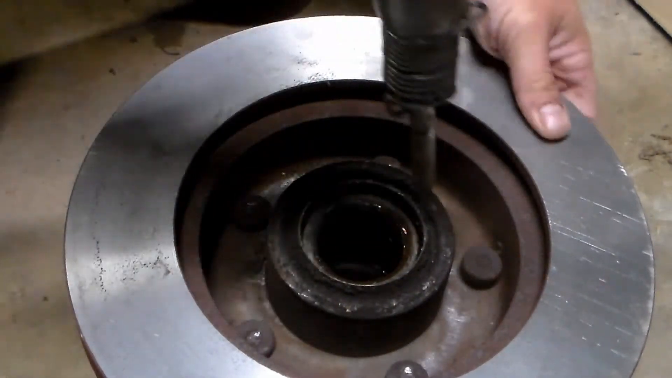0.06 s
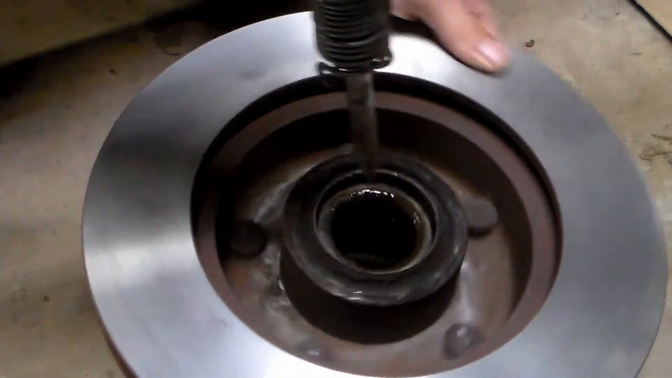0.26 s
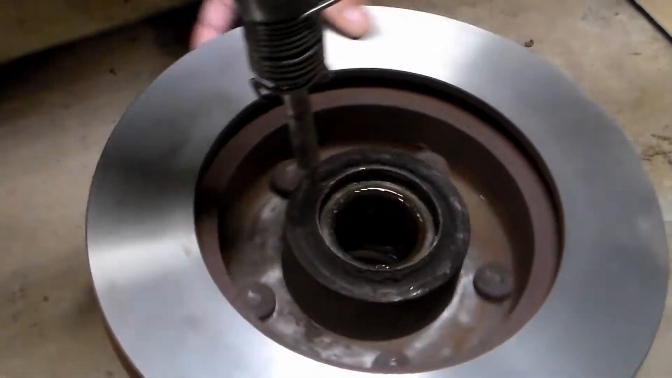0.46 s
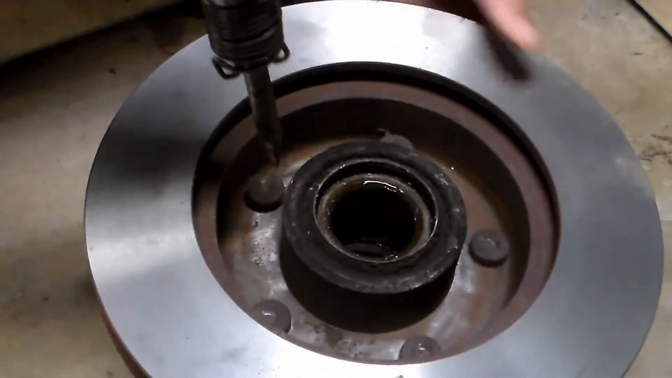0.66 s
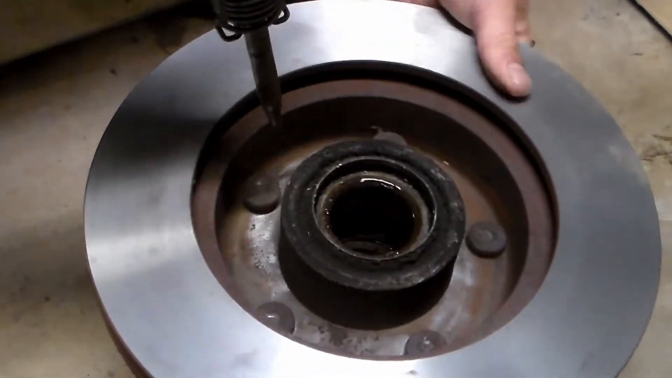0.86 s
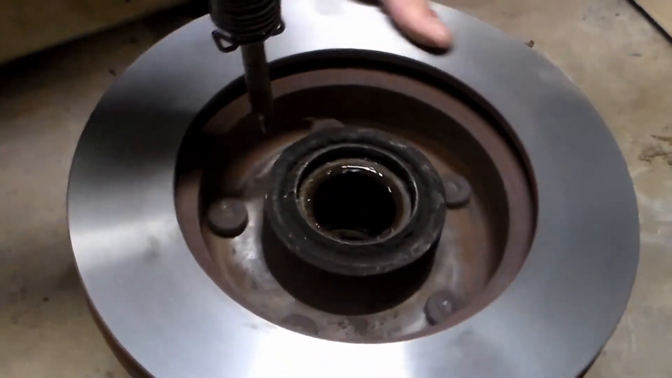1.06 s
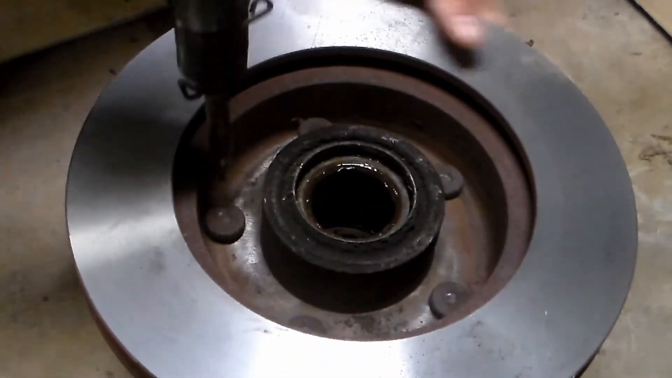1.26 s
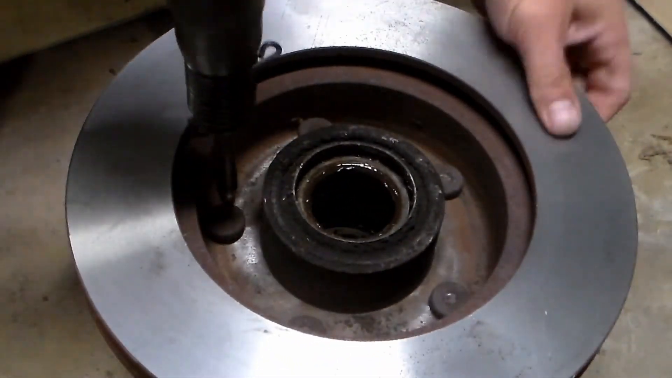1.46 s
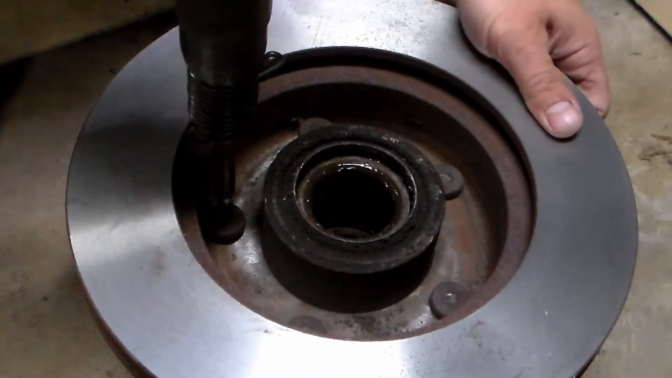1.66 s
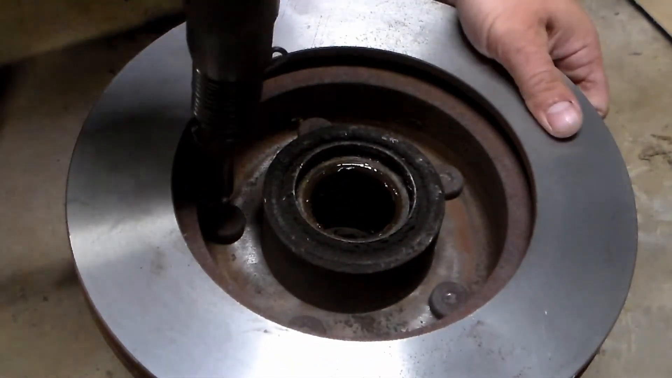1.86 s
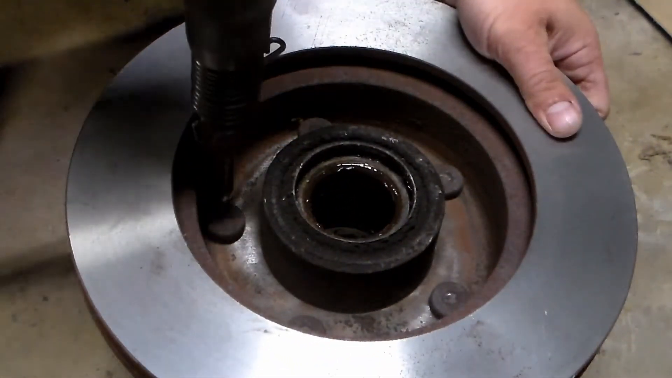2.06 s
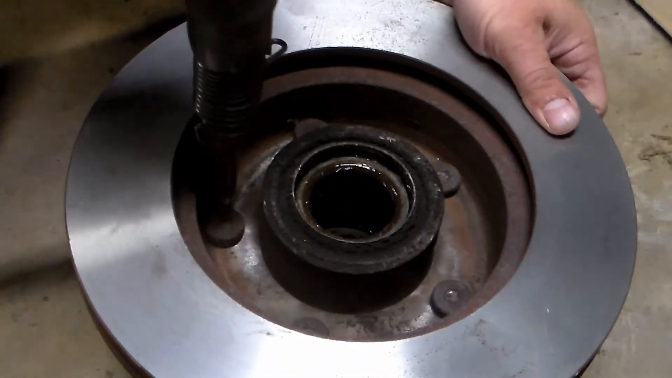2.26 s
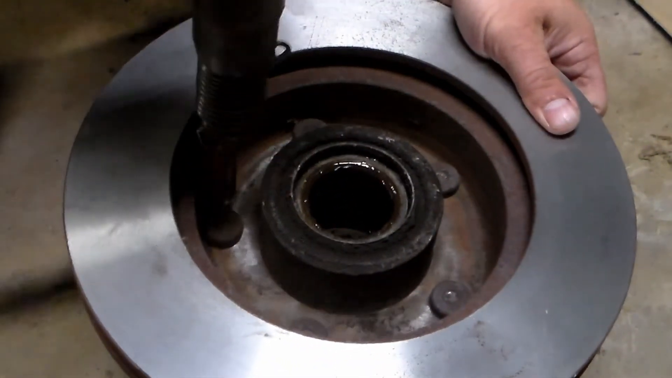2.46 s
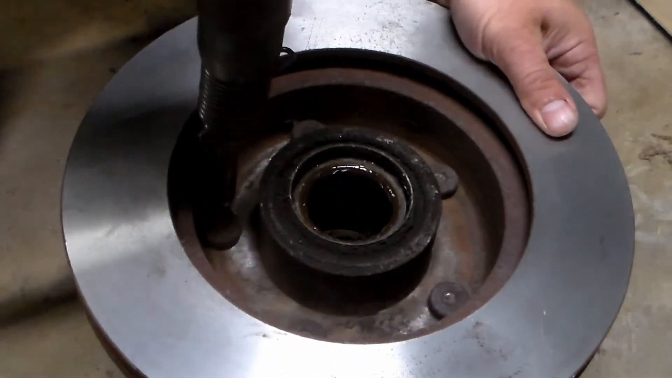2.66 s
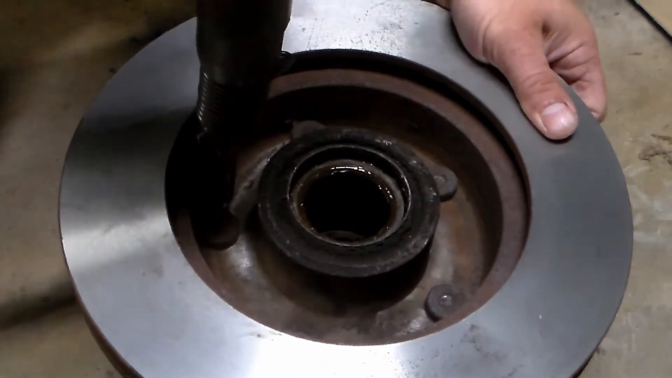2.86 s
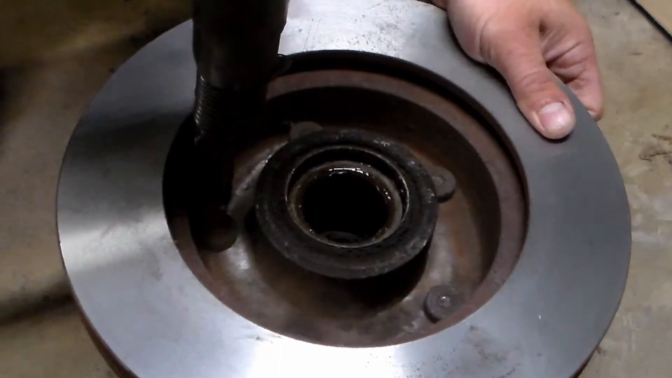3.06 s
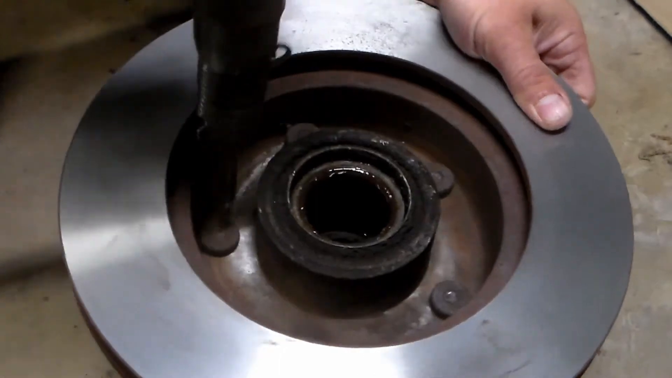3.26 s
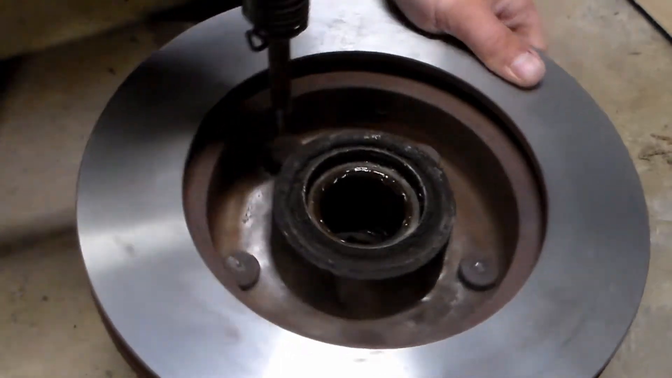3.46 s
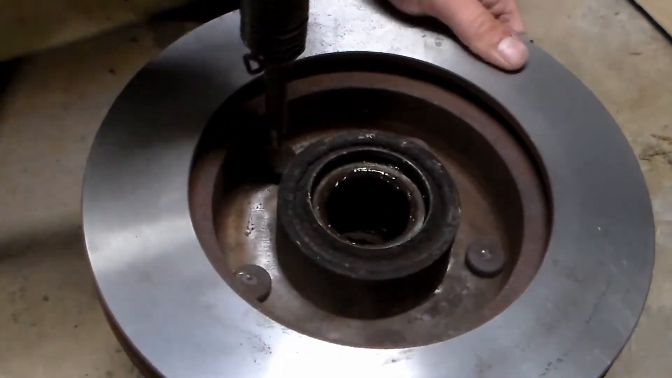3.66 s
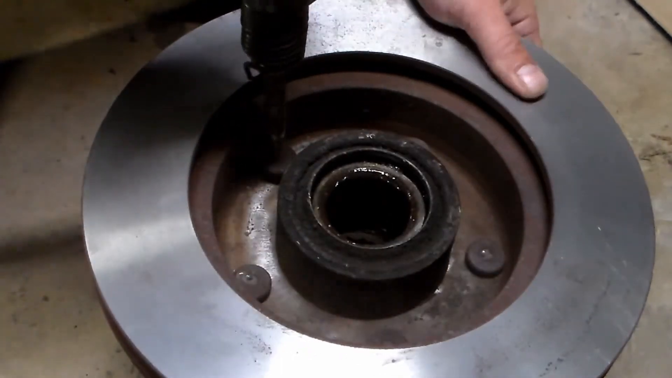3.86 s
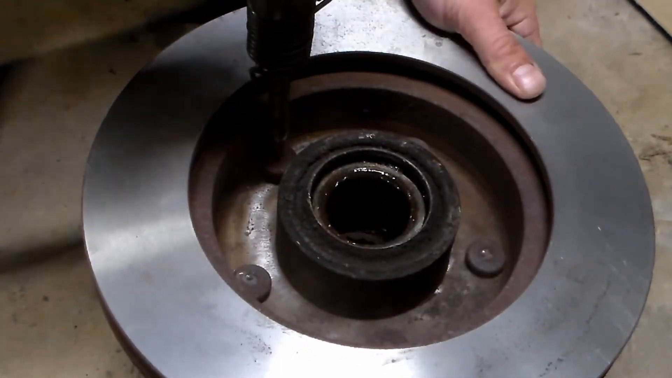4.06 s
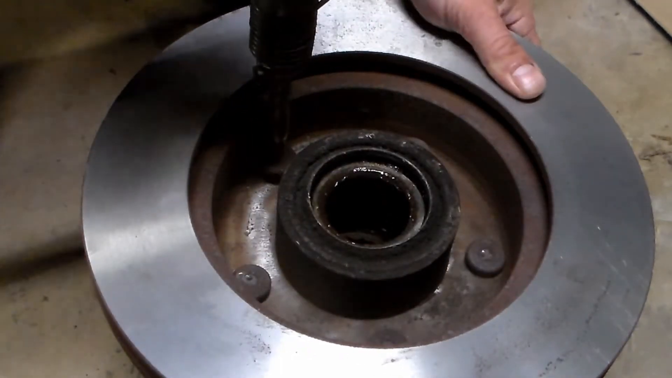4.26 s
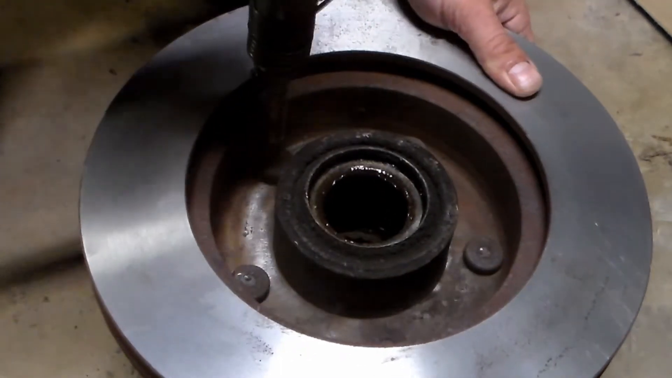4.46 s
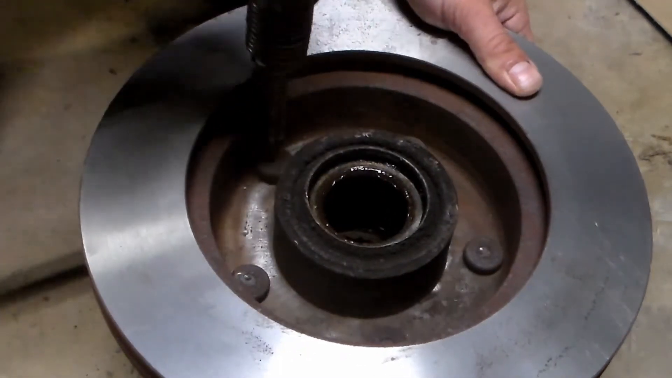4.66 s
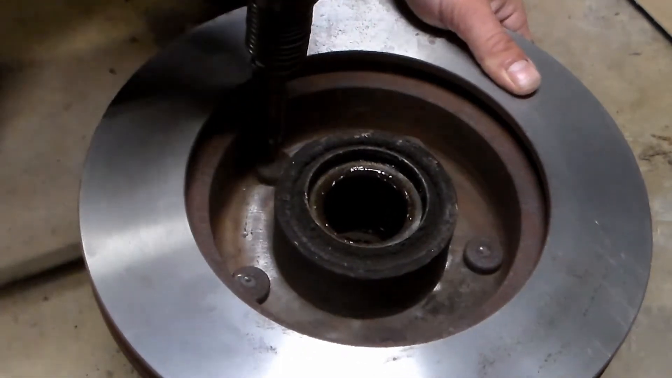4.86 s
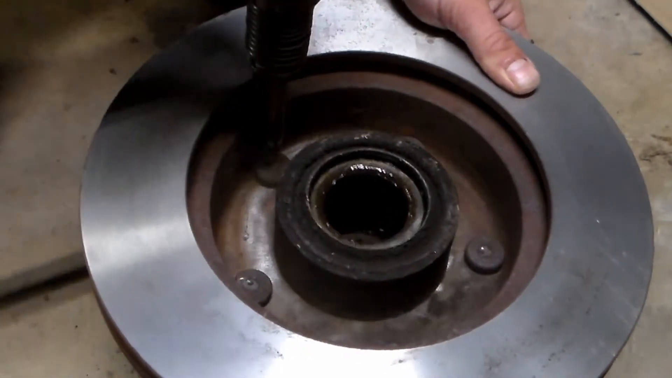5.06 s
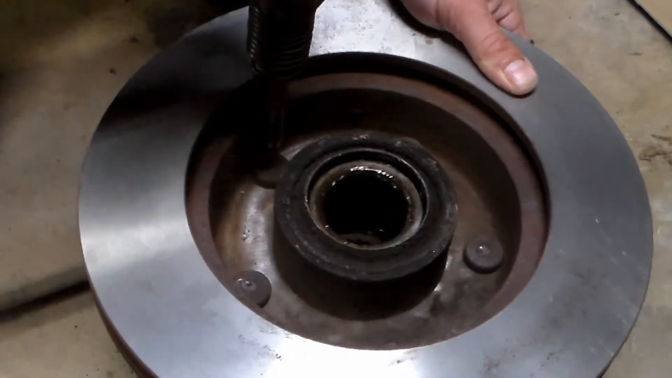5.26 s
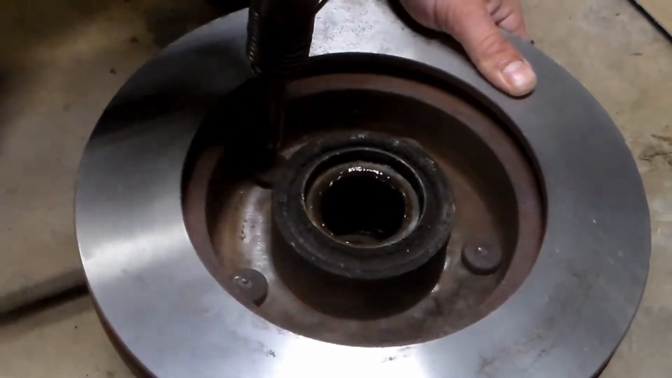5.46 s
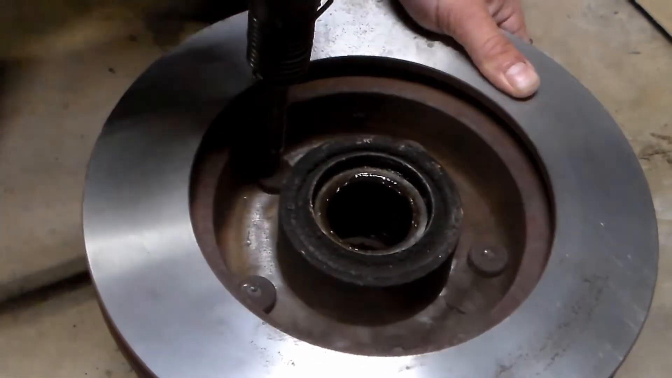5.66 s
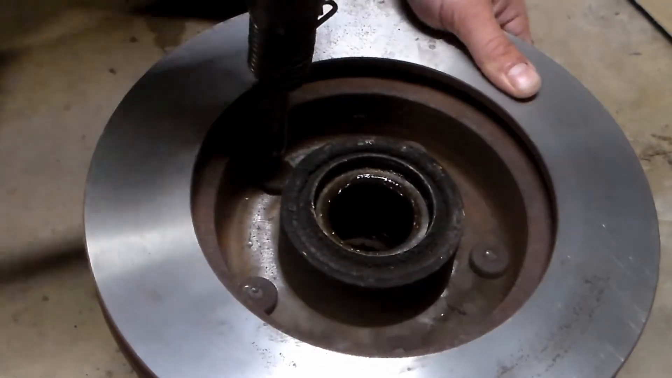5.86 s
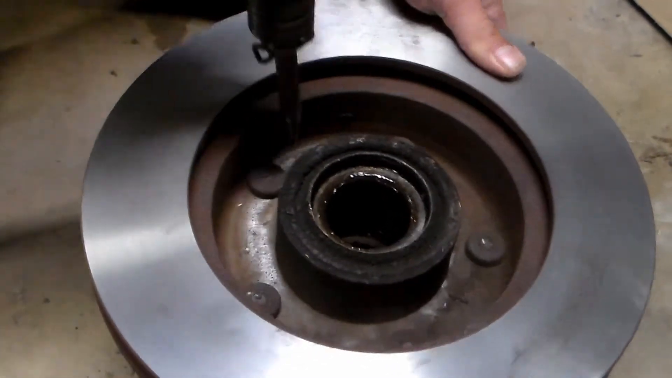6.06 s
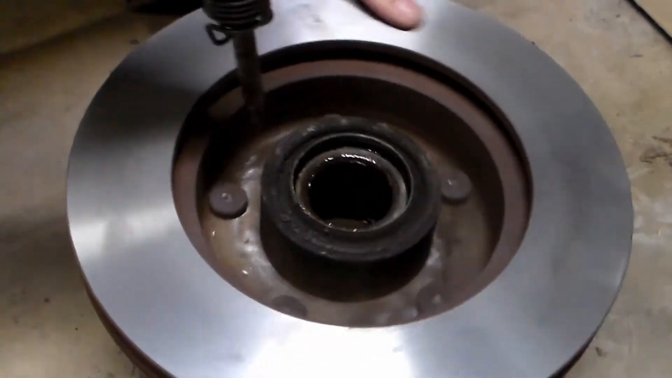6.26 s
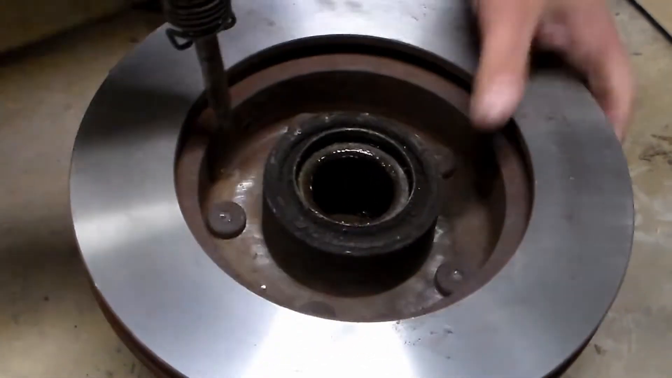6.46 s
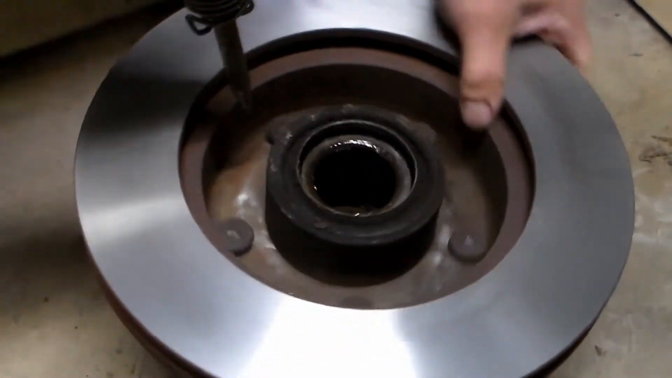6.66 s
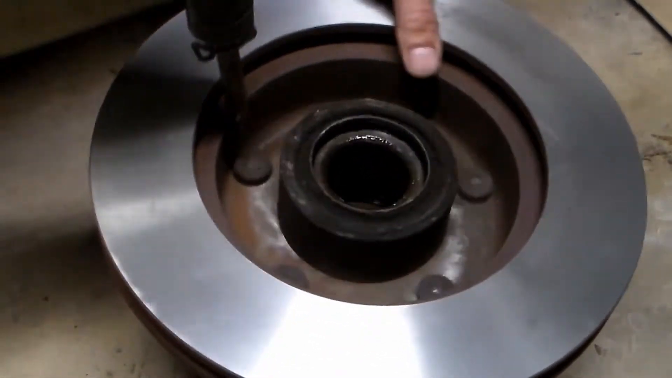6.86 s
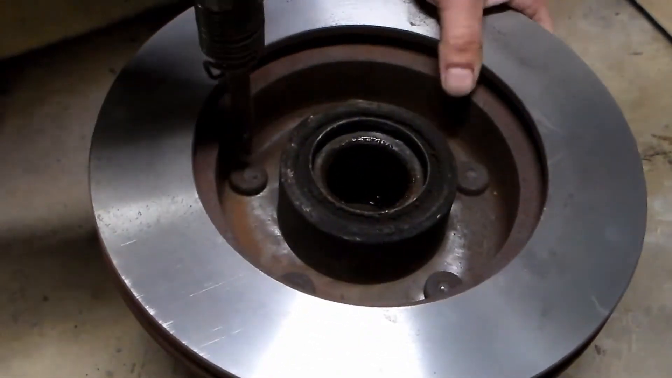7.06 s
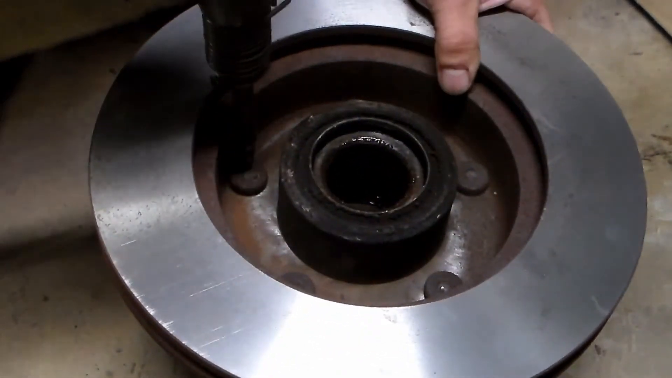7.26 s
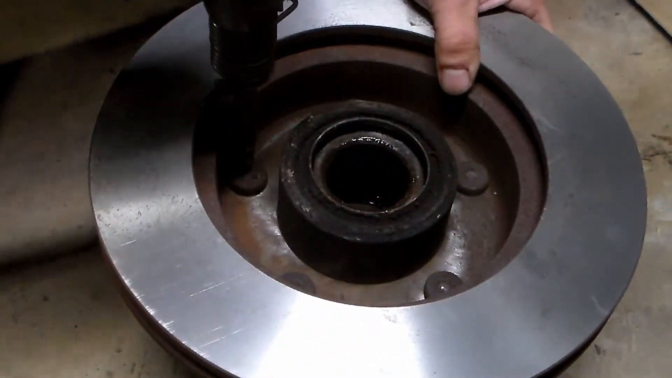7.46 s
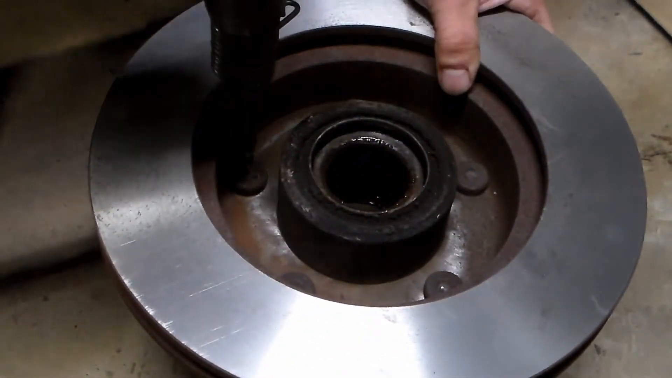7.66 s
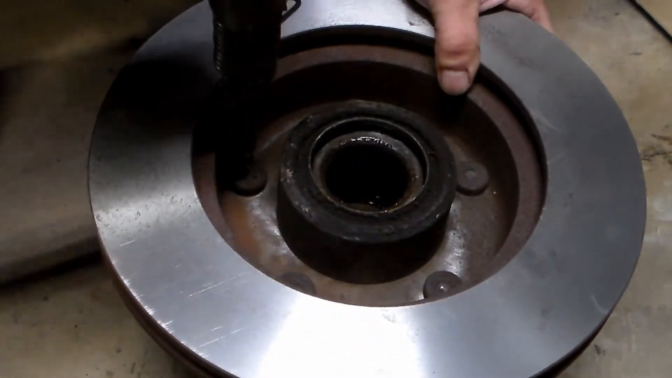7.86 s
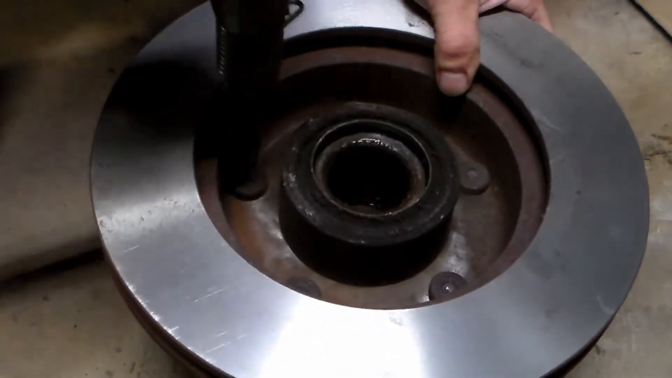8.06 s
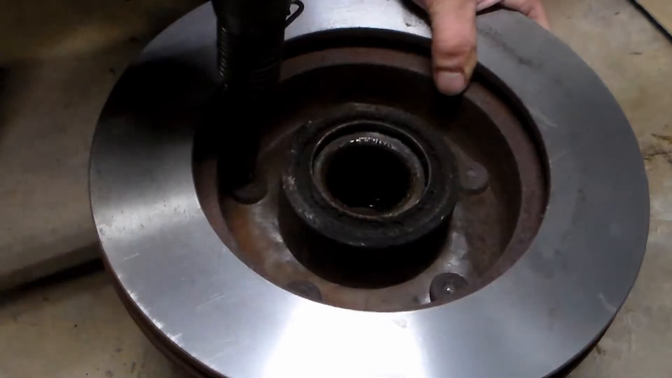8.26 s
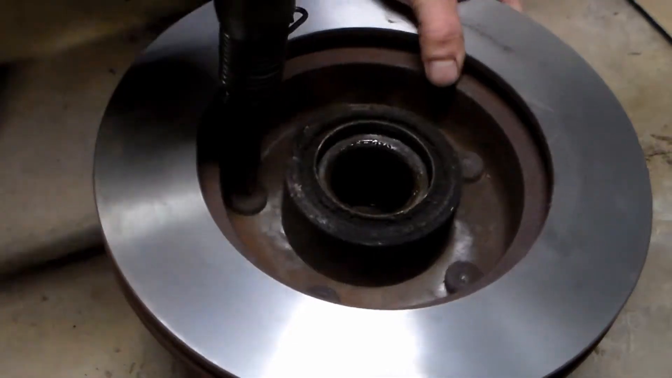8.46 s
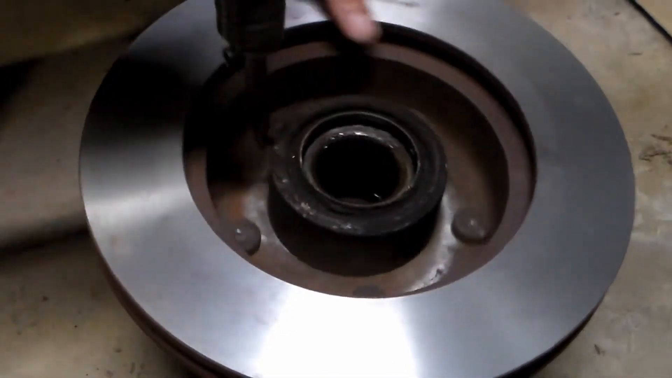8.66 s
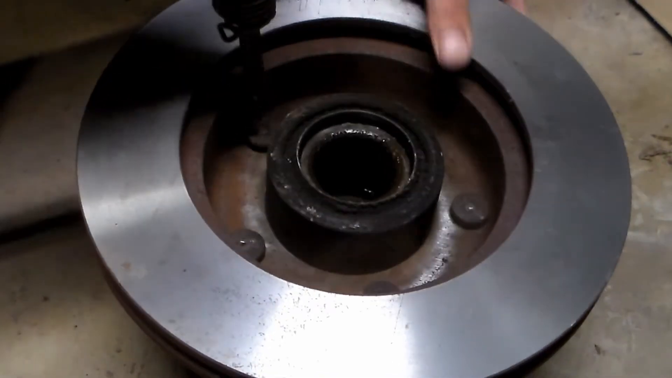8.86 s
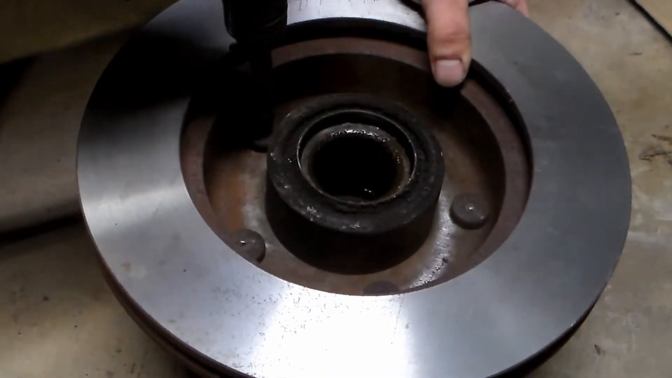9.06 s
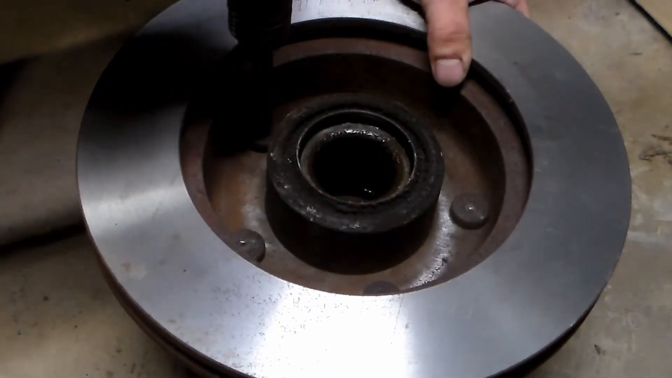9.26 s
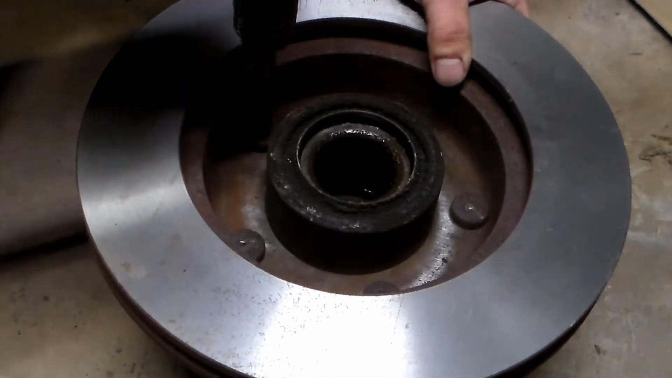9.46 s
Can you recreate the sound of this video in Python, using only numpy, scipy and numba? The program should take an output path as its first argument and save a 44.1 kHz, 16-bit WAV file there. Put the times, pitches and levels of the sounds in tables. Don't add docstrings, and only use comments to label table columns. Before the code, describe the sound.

A small close stereo microphone in a garage with faint mains hum and hiss that duck after loud sounds and creep back. From 0.1 to 0.8 s a heavy iron disc scrapes over concrete, rocking with clicks and dull clunks; another gritty drag follows at 1.0-1.4. Light chisel taps come at 1.7-1.9. Four very short air hammer bursts strike at 2.3, 2.6, 2.85 and 3.1, each two to four or so blows about 30 ms apart: popping exhaust, hissing air, bright ringing iron, the loudest distorting. Quiet scrape at 3.5, taps at 4.1. Five bursts follow at 4.5, 4.85, 5.15, 5.4 and 5.65. At 6.3-6.7 the disc is dragged and knocked more strongly, wobbling to rest by 7.1. Faint taps at 7.4-7.85, then two hard bursts at 8.05 and 8.35. Quiet, with a small ping at 8.9 and chisel taps at 9.2-9.5.

```python
import sys
import numpy as np
from scipy import signal
from scipy.fft import rfft, irfft
from scipy.io import wavfile
from scipy.ndimage import uniform_filter1d, map_coordinates
from numba import njit

SR = 44100
rng = np.random.default_rng(int(sys.argv[2]) if len(sys.argv) > 2 else 0)


def makeup_ratio(level_db):
    decades = np.asarray(level_db, float) / 20
    return 10 ** decades


def transcribe(signal):
    frames = np.atleast_2d(signal).T
    limited = np.clip(frames, -1, 1)
    pcm = np.round(limited * 32767).astype(np.int16)
    wavfile.write(sys.argv[1], SR, pcm)


N = 419832
HOLD = 1300

# (first stroke [s], period [s], strokes [count])
BURSTS = [(2.2972, .0307, 2), (2.5913, .0296, 3), (2.8622, .0298, 3), (3.0958, .0296, 3),
          (4.4938, .0304, 4), (4.8539, .0301, 4), (5.15, .0302, 4), (5.3941, .0296, 4), (5.6558, .0295, 3),
          (8.0664, .0291, 4), (8.3578, .0286, 4)]
# (ring 2-3 kHz [dB], 3-5.5 kHz [dB], above 5.5 kHz [dB])
BITE = [(-5.0, -1.5, -6.5), (-6.0, -12.0, -13.0), (-10.5, -8.0, -9.0), (-13.5, -9.5, -12.5),
        (-4.5, -6.0, -6.5), (-1.0, -3.5, -6.5), (-6.0, -5.5, -5.5), (-6.0, -10.5, -11.0),
        (-1.5, -5.0, -5.5), (0.0, -5.5, -4.0), (-8.5, -8.5, -8.0), (-15.0, -13.0, -11.5),
        (-9.0, -15.0, -15.0), (-7.0, -1.0, -6.5), (-2.0, -5.0, -8.0), (-12.0, -6.0, -9.5),
        (-9.5, -9.5, -11.5), (0.0, -3.0, -7.5), (-9.5, -12.0, -11.5), (-7.5, -2.5, -8.0),
        (-12.5, -9.5, -10.5), (-0.5, -3.5, -6.5), (-13.0, -8.0, -9.0), (-6.5, -3.5, -5.5),
        (-6.5, -7.5, -7.0), (-7.5, -4.5, -6.0), (-8.5, -6.5, -11.5), (-7.5, -3.0, -5.5),
        (-10.5, -2.5, -7.0), (-12.0, -10.5, -9.5), (-5.0, -6.5, -9.5), (4.0, -2.5, -2.5),
        (-4.0, -6.0, -10.0), (-2.0, -4.0, -6.5), (-1.5, -5.5, -4.5), (-1.0, -4.0, -6.0), (3.5, -0.5, -5.0),
        (3.5, -2.5, -7.5)]
# (time [s], pop [dB], ring [dB], crack [dB])
STARTS = [(2.28, -16.5, -30.5, -14), (2.578, -18, -26, -10), (2.8286, -8, -23.5, -14),
          (2.8426, -9.5, -26.5, -23), (3.0642, -5, -13, -10.5), (3.0773, -18, -29.5, -21),
          (4.478, -13.5, -25, -14), (4.841, -24, -21.5, -14), (5.1166, -8, -20.5, -14.5),
          (5.1336, -13.5, -25, -21), (5.3785, -21.5, -30.5, -12.5), (5.6243, -5.5, -16.5, -6.5),
          (8.051, -12.5, -27.5, -15), (8.325, -14, -27, -14), (8.3396, -13, -31.5, -12.5)]
# (time [s], pop [dB], ring in the three ranges [dB] x 3)
LASTS = [(2.3582, -9.5, -36.0, -36.0, -29.5), (2.3602, -29.0, -3.0, -8.5, -8.0),
         (2.684, -10.5, -2.0, -6.5, -5.5), (2.9543, -8.0, 2.5, -6.0, -5.5), (3.1873, -8.0, 3.0, -7.5, -6.0),
         (4.6173, -19.0, -12.5, -12.5, -10.5), (4.9791, -9.5, -9.5, -6.5, -8.5),
         (5.2915, -18.0, -17.0, -15.5, -18.0), (5.5155, -11.0, -9.5, -3.5, -8.5),
         (5.7451, -6.0, -10.0, 0.0, -4.0), (5.7995, -25.0, -27.5, -21.0, -21.5),
         (8.1837, -6.5, -9.5, -8.0, -6.0), (8.4795, -19.5, -2.5, -12.0, -5.5)]
POP_DB, POP_SCATTER_DB = -2, .9


def strokes():
    s = [first + k * period for first, period, count in BURSTS for k in range(count)]
    pop_db = POP_DB + POP_SCATTER_DB * rng.standard_normal(len(s))
    full = np.column_stack([s, pop_db, BITE])
    starts = np.array(STARTS)[:, [0, 1, 2, 2, 2]]
    return np.vstack([full, starts, LASTS]).T


# (frequency [Hz], level [dB], t60 [s])
BARREL_MODES = [(148, -31.5, 0.071), (322, -24.5, 0.019), (550, -2.5, 0.012), (634.5, -9.5, 0.039),
                (985, -3.5, 0.016)]


def exhaust(s, pop_db):
    late, uneven = rng.standard_normal((len(s), 2)).T
    kicks = spikes(s, pop_db)
    kicks = kicks + spikes(s + .0135 + .0007 * late, pop_db - 12 + 2.5 * uneven)
    pop = -makeup_ratio(4) * band(ring(kicks, BARREL_MODES), 90, 6000)
    puff = swell(spikes(s + .0067, pop_db), .0032, .0063) * band(stereo(.83), 150, 1500)
    vent = swell(spikes(s + .012, 2 * pop_db), .0013, .004)
    crack = swell(spikes(s, pop_db / 2 - 8), .0006, .0025)
    jet = (vent + crack) * band(stereo(.17), 2100, 14000)
    return pop + makeup_ratio(5.5) * puff + makeup_ratio(2) * jet


# (frequency [Hz], level [dB], t60 [s])
DISC_MODES = [(2238, -5, .55), (2420, -6, .4), (2528, -7, .37), (2620, -11, .25), (3455, -7, .4),
              (3380, -15, .2), (3560, -11, .2), (4122, -6, .4), (4050, -15, .2), (4230, -2, .06),
              (4620, -15, .2), (4920, -10, .25), (5330, -7, .2), (5440, -11, .2), (6390, -9, .3),
              (6575, -7, .4), (6770, -5, .4), (6930, -8, .4), (7900, -3, .08), (8320, -1.5, .14),
              (9170, -3, .089), (10100, -1.5, .094)]
# (frequency [Hz], density [dB per Hz])
CLATTER_SPECTRUM = [(710, -25.5), (1200, 9.5), (2050, -25.5), (2180, -17), (2480, 9.5), (2900, -12),
                    (3460, -1), (5790, -4), (6700, -6), (12700, -8), (14700, -21)]


def struck_disc(s, ring_db):
    edges_hz = (1900, 3000, 5500, 13000)
    delays_s = (.0035, .0028, .0008)
    metal = iron(s, ring_db, edges_hz, DISC_MODES, CLATTER_SPECTRUM, delays_s, rise_s=.00089, fall_s=.0056,
                 damp=.11, blow_db=11.5, held_db=-18.5, free_db=-41.5, clatter_db=5, seated=True)
    at, *_, crack_db = np.transpose(STARTS)
    return metal + makeup_ratio(11) * swell(spikes(at, crack_db), .0008, .0027) * band(stereo(.25), 4500, 13000)


# (opens [s], shuts [s], level [dB])
TRIGGER = [(2.25, 2.373, -25.5), (2.561, 2.707, -24.5), (2.812, 2.969, -27), (3.054, 3.211, -21.5),
           (4.452, 4.638, -21), (4.829, 5, -19), (5.145, 5.272, -20.5), (5.371, 5.535, -17),
           (5.612, 5.757, -19), (8.025, 8.208, -21), (8.347, 8.484, -18.5)]
LEAK_S, LEAK_DB = .035, -21.5


def valve_air():
    t = np.arange(N) / SR
    valve = 0
    for on, off, db in TRIGGER:
        held = (t > on) * (t < off)
        leak = np.clip((t - on) / LEAK_S + 1, 0, 1) * (t < on)
        valve = valve + makeup_ratio(db) * (held + makeup_ratio(LEAK_DB) * leak)
    flow = swell(valve, .002, .004) / 176
    jet = [(300, -1.5), (1500, -3), (3300, 4.5), (4500, -5.0), (8000, 3.5), (14000, -3.5)]  # (Hz, dB)
    return flow * colour(stereo(.75), jet)


def hammer():
    s, pop_db, *ring_db = strokes()
    s = s - .00035
    return exhaust(s, pop_db) + struck_disc(s, ring_db) + valve_air()


# (time [s], click [dB], thud [dB], clank [dB])
ROCKS = [(0.363, -26.0, -23.5, -42.0), (0.383, -7.0, -27.0, -28.5), (0.406, -34.0, -29.0, -35.5),
         (0.443, -17.5, -23.5, -18.0), (0.468, -2.5, -26.0, -31.0), (0.476, -15.0, -24.0, -34.0),
         (0.506, -19.0, -32.5, -28.5), (0.53, -10.0, -30.0, -28.5), (0.553, -5.5, -30.0, -32.0),
         (0.65, -8.5, -40.0, -41.5), (0.661, -31.0, -33.5, -34.5), (0.695, -5.5, -40.0, -24.5),
         (0.724, -17.5, -38.5, -33.0), (0.76, -2.0, -33.5, -24.0), (6.381, -32.5, -34.0, -49.0),
         (6.407, -13.5, -25.0, -31.5), (6.434, -7.0, -26.5, -22.0), (6.459, -24.5, -20.0, -29.5),
         (6.484, -28.0, -21.0, -34.0), (6.496, -32.0, -30.0, -43.0), (6.51, -21.0, -25.5, -30.5),
         (6.534, -26.5, -28.0, -37.0), (6.392, -37.0, -38.0, -53.5), (6.55, -34.0, -39.5, -47.5),
         (0.427, -30.0, -38.5, -44.5), (0.586, -23.5, -39.0, -47.0), (0.673, -34.0, -42.5, -46.5)]
# (time [s], click [dB], thud [dB], clank [dB])
SETTLES = [(6.706, -13.0, -41.5, -46.5), (6.812, -12.5, -26.5, -45.5), (6.834, -12.0, -18.0, -18.0),
           (6.875, -12.5, -26.0, -17.0), (6.922, -43.0, -29.0, -23.5), (6.965, -34.5, -29.5, -20.5),
           (7.019, -22.0, -37.5, -36.0), (7.055, -12.0, -41.5, -42.0)]
# (time [s], click [dB], thud [dB], clank [dB], own pitch [Hz])
TAPS = [(1.683, -3, -55, -37, 970), (1.691, -13, -42, -41, 2300), (1.828, -28, -51, -50, 3300),
        (1.85, -10, -43, -46, 930), (1.887, -22, -43, -42, 940), (1.939, -12.5, -32.5, -36.5, 601),
        (2.257, -18, -37, -34, 3200), (3.598, -32, -62, -67, 854), (4.101, -19.5, -40, -42, 1530),
        (4.117, -13, -32.5, -34, 3020), (7.431, -42, -53, -54, 1020), (7.451, -25, -47, -48.5, 3080),
        (7.505, -32, -49, -42, 3200), (7.642, -42, -46, -47, 3100), (7.664, -15, -34, -31, 3000),
        (7.731, -31.5, -38, -48, 3100), (7.85, -32, -57.5, -54, 3170), (9.22, -5, -36, -30, 1200),
        (9.251, -28.5, -36, -34, 2990), (9.263, -27, -40, -38, 3130), (9.396, -22, -49, -48, 520),
        (9.48, -31, -53, -62, 500)]
ROCK_HZ, SETTLE_HZ, NOTE_SPREAD = 1320, 2475, .058
BRIGHTEN = 1.51
ROCK_TICK_DB, SETTLE_TICK_DB = 2.5, 6.5
TAP_TICK_DB = -2.5


def knocks():
    rows = []
    for table, tick_db, hz in (ROCKS, ROCK_TICK_DB, ROCK_HZ), (SETTLES, SETTLE_TICK_DB, SETTLE_HZ):
        for row in table:
            pitch_hz = hz * (1 + NOTE_SPREAD * rng.standard_normal())
            rows.append((*row, BRIGHTEN * row[-1] + tick_db, pitch_hz))
    for s, click, thud, clank, hz in TAPS:
        rows.append((s, click, thud, clank, clank + TAP_TICK_DB, hz))
    return np.transpose(rows)


# (time [s], peak [dB])
SNAPS = [(.384, -36), (.444, -36), (.531, -20), (.696, -34), (.76, -34), (1.684, -32), (1.692, -29),
         (4.1182, -15.5), (6.435, -27), (7.666, -36), (9.227, -30), (9.398, -42.5)]


def clicks(s, peak_db):
    click = band(band(spikes(s, peak_db), 350, 3600), 300, 9000)
    snap = swell(spikes(*np.transpose(SNAPS)), .0003, .0022) * band(stereo(.4), 4500, 9900)
    return click + makeup_ratio(5) * snap


def knock_notes(s, peak_db, pitch_hz):
    note_db, note_t60_s = -16, .016
    t = np.arange(3000) / SR
    decay = np.exp(-np.log(1000) * t / note_t60_s)
    notes = np.zeros(N + len(t))
    for at, db, hz in zip((s * SR).astype(int), peak_db, pitch_hz):
        notes[at:at + len(t)] += makeup_ratio(db + note_db) * decay * np.sin(2 * np.pi * hz * t)
    rough = 1 + 4 * uniform_filter1d(rng.standard_normal(len(notes)), 40)
    return (notes * rough)[:N]


# (frequency [Hz], level [dB], t60 [s])
HUB_MODES = [(337.7, -9.5, 0.41), (412, -5, 0.07), (480, -8, .05), (564, 4, 0.027), (646, 6.5, 0.008),
             (1096, -1.5, 0.029), (1035, -9, 0.018), (1330, -9, 0.025)]
# (frequency [Hz], level [dB], t60 [s])
RIM_MODES = [(2275, -3, .085), (2490, -2, .05), (2660, -4, .04), (3500, -7, .035), (4950, 2, .035),
             (6900, -8, .035)]
# (frequency [Hz], level [dB], t60 [s])
STUD_MODES = [(1090, 0, .07), (1430, -3, .055), (2272, -4, .06), (2490, -4, .05), (2700, -4, .05),
              (2930, 0, .06), (3250, -1, .045), (3750, -6, .05), (4780, -9, .035), (5520, -8, .03),
              (6300, -10, .03), (6770, -9, .03), (8300, -12, .03)]
# (frequency [Hz], density [dB per Hz])
KNOCK_SPECTRUM = [(150, -34.5), (300, 7), (550, 6), (1000, 0), (1400, 13.5), (2000, -14), (3100, -3.5),
                  (5000, 1), (9000, -13), (14000, -22)]
# (frequency [Hz], density [dB per Hz])
TAP_SPECTRUM = [(300, -2.5), (1200, 2), (2000, -4), (3100, 5), (6500, -3.5), (14000, -11)]


def knocked_iron(s, ring_db):
    edges_hz = (300, 1700, 4000, 12000)
    disc, taps = np.split(np.array([s, *ring_db]), [-len(TAPS)], axis=1)
    body = iron(taps[0], taps[1:], edges_hz, HUB_MODES[:5] + STUD_MODES, TAP_SPECTRUM, (0, 0, 0), rise_s=.0011,
                fall_s=.01, damp=.34, blow_db=11, held_db=-23, free_db=-42, clatter_db=0)
    body += iron(disc[0], disc[1:], edges_hz, HUB_MODES + RIM_MODES, KNOCK_SPECTRUM, (0, 0, 0), rise_s=.00078,
                 fall_s=.0056, damp=.61, blow_db=17, held_db=-23.5, free_db=-48, clatter_db=5)
    return body


# (time [s], peak [dB])
PINGS = [(1.7325, -39.5), (3.703, -33), (3.716, -40), (6.348, -23), (6.36, -30), (8.9352, -29),
         (9.2221, -34)]
# (frequency [Hz], level [dB], t60 [s])
CHISEL_MODES = [(3690, -10, 0.04), (3400, -13, 0.025), (3900, -16, .02), (8800, 2, 0.016),
                (8560, -7, 0.016)]


def loose_chisel():
    rattle = swell(spikes(*np.transpose(PINGS)), .000063, .0018) * stereo(.64)
    return makeup_ratio(-16) * ring(rattle, CHISEL_MODES) + makeup_ratio(-14) * band(rattle, 1710, 11900)


def rim_tink():
    modes = [(2280, 0, .12), (1100, -8, .08), (1700, 0, .01)]  # (Hz, dB, t60 s)
    return ring(spikes(6.7075, -36), modes)


# (start [s], length [s], level [dB])
SINGS = [(0.13, 0.2, -59), (6.63, 0.13, -55), (9.06, 0.08, -68)]
# (frequency [Hz], level [dB], t60 [s])
SONG_MODES = [(2250, 1, .08), (3710, -1, 0.13), (5120, -5, .1), (6550, -9, .1)]
# (start [s], length [s], level [dB])
CHATTERS = [
    (.36, .26, -45),
    (.64, .19, -47),
    (6.39, .2, -43),
    (6.76, .3, -48),
]
# (frequency [Hz], level [dB], t60 [s])
CHATTER_MODES = [(2275, -3, .09), (2480, -2, .04), (2660, -4, .03), (1090, -6, .05), (420, 2, .03)]


def friction():
    return rubbed(SINGS, SONG_MODES) + rubbed(CHATTERS, CHATTER_MODES)


def handling():
    s, peak_db, *ring_db, pitch_hz = knocks()
    s = s + .0012
    knock = makeup_ratio(-6) * clicks(s, peak_db) + knock_notes(s, peak_db, pitch_hz) + knocked_iron(s, ring_db)
    return band(knock, 300, 14000) + loose_chisel() + rim_tink() + friction()


# (start [s], length [s], rumble [dB], ring [dB])
DRAGS = [(0.085, 0.74, -55, -52), (0.302, 0.36, -43.5, -64), (0.593, 0.27, -46, -70),
         (1.023, 0.37, -43, -46), (3.5, 0.4, -55, -74), (4.087, 0.18, -52.5, -60),
         (6.295, 0.41, -36.5, -48), (6.718, 0.19, -38, -40)]
# (frequency [Hz], density [dB per Hz])
SCRAPE_SPECTRUM = [(1000, -38), (1700, -8), (2030, -15), (2550, 1), (3240, -13), (4260, -2), (4770, -12),
                   (5690, -17), (7100, -4), (7890, -19), (8770, -19), (10600, -13), (14000, -27)]
PUSH_EDGE_DB, PUSH_FLAT = -21.5, 2.43


def drag():
    t = np.arange(N) / SR
    low, high = np.zeros(N), np.zeros(N)
    for start, length, rumble_db, ring_db in DRAGS:
        off = np.abs(2 * (t - start) / length - 1)
        push = makeup_ratio(PUSH_EDGE_DB * np.minimum(off, 1) ** PUSH_FLAT) * (off < 1)
        low += makeup_ratio(rumble_db) * push
        high += makeup_ratio(ring_db) * push
    grain = np.minimum(rng.exponential(size=(2, N // 150 + 1)), 3)
    bumps, grit = np.repeat(grain, 150, axis=1)[:, :N]
    hub = ring(stereo(1) * makeup_ratio(2.8 * bumps), HUB_MODES, damp=.62)
    rim = colour(stereo(.64), SCRAPE_SPECTRUM) * makeup_ratio(2.2 * grit)
    return low * hub / hub.std() + high * rim / rim.std()


# (centre [Hz], t60 [s], likeness of the ports [0-1])
ROOM = [(338, 0.39, 1), (2500, 0.38, 1), (8300, 0.25, 1)]
WANDER_S = .00009


def walls(x):
    t = np.arange(SR // 2) / SR
    tail = 0
    for hz, t60, like in ROOM:
        noise = band(stereo(like)[:, :len(t)], hz / 2.9, min(hz * 1.9, 16000))
        tail = tail + noise * makeup_ratio(-60 * t / t60)
    tail = tail * np.clip(t / .005, 0, 1)
    tail = tail / np.sqrt(np.sum(tail ** 2, axis=1, keepdims=True))
    wet = signal.fftconvolve(x, tail, axes=1)[:, :N]
    drift = uniform_filter1d(uniform_filter1d(rng.standard_normal(N), 500), 500)
    path = np.arange(N) + WANDER_S * SR * drift / drift.std()
    return np.array([map_coordinates(port, [path], mode="nearest") for port in wet])


# (closes [s], reopens [s], first gain [dB], last gain [dB])
DUCKS = [
    (0.403, 1.054, -25, -16),
    (2.286, 3.743, -21.5, -15),
    (4.473, 6.271, -19.5, -20),
    (6.42, 6.53, -7, 0),
    (6.83, 7.413, -12.5, -31),
    (8.024, 9.039, -8.5, -15),
]
CLOSE_S, JUMP_S, JUMP_DB, RECOVER_S, OPEN_DB = .046, .036, -6, .16, -.5


def ducking(t):
    rows = [(0, OPEN_DB)]
    for shut, back, first_db, last_db in DUCKS:
        rows = [r for r in rows if r[0] < shut]
        rows += [(shut, rows[-1][1]), (shut + CLOSE_S, first_db), (back, last_db)]
        rows += [(back + JUMP_S, JUMP_DB), (back + RECOVER_S, OPEN_DB)]
    return np.interp(t, *np.transpose(rows))


# (frequency [Hz], level [dB rms])
HUM = [(30, -53), (60, -46), (120, -64.5), (180, -60), (300, -67.5)]
# (frequency [Hz], density [dB per Hz])
HISS_SPECTRUM = [(12, -34), (20, -6.5), (69, -12), (89, -9), (114, -30), (182, -11), (234, -26),
                 (300, -18.5), (983, -30.5), (12100, -38.5), (14700, -53)]
HISS_DB, PREAMP_DB = -60, -62.5
STEPS_S, STEP_GAP_S, STEP_DB = 9.066, .011, -43


def garage():
    t = np.arange(N) / SR
    hum = sum(makeup_ratio(db) * np.sqrt(2) * np.sin(2 * np.pi * hz * t + k) for k, (hz, db) in enumerate(HUM))
    flutter = 1 + 3 * uniform_filter1d(rng.standard_normal(N), 1500)
    hum = hum * makeup_ratio(np.array([[-.4], [.4]])) * flutter
    hiss = makeup_ratio(HISS_DB + 6) * colour(stereo(.16), HISS_SPECTRUM)
    preamp_spectrum = [(30, 11.5), (70, 6.0), (135, 20.0), (200, 11), (400, 10.5), (2000, -2.5), (14000, -11.0)]
    preamp = makeup_ratio(PREAMP_DB) * colour(stereo(.17), preamp_spectrum)
    gain = makeup_ratio(uniform_filter1d(ducking(t), 800))
    steps = np.arange(7)
    ticks = spikes(STEPS_S + STEP_GAP_S * steps, STEP_DB - 1.5 * steps)
    return gain * (hum + hiss) + preamp + band(np.cumsum(ticks), 150, 3150)


# (frequency [Hz], level [dB])
PORT_TILT = [(100, -1.5), (400, 0), (1500, -0.66), (5000, 0.8), (12000, 1.1)]


def tilt_ports(x):
    f = np.fft.rfftfreq(N, 1 / SR) + 1
    hz, db = np.transpose(PORT_TILT)
    tilt_db = np.interp(np.log(f), np.log(hz), db) * np.array([[.5], [-.5]])
    return irfft(rfft(x) * makeup_ratio(tilt_db), N)


# (time [s], left dip [full scale], right dip [full scale])
JOLTS = [(2.652, 0.049, .01), (2.895, 0.23, .06), (3.098, 0.14, 0.15), (8.098, -0.04, .12),
         (8.125, 0.45, .01), (8.156, 0.092, 0.29), (8.39, -0.35, .01), (8.445, -0.099, 0.3)]
CLIP, DIP_S, REBOUND_S, REBOUND = .84, .014, .09, .3


def overload(ports):
    clipped = np.clip(ports, -CLIP, CLIP)
    load = clipped ** 2
    bias = swell(load, .12, .006) / (SR * .026) * 1.1
    bias = bias - swell(load, .014, .014) / (SR * .048) * .082
    jolts = np.full(ports.shape, 1e-18)
    jolts[:, (np.array(JOLTS)[:, 0] * SR).astype(int)] = np.transpose(JOLTS)[1:]
    shift = REBOUND * swell(jolts, .03, REBOUND_S) - swell(jolts, .004, DIP_S)
    return clipped + shift + bias * np.array([[1.3], [.7]])


def iron(s, group_db, edges_hz, modes, clatter, delays_s, rise_s, fall_s, damp, blow_db, held_db, free_db,
         clatter_db, seated=False):
    scatter_db = 3
    out = 0
    for db, lo, hi, delay_s, like in zip(group_db, edges_hz, edges_hz[1:], delays_s, (.9, .6, .2)):
        blow = spikes(s + delay_s, db)
        contact = swell(blow, rise_s, fall_s)
        force = contact * stereo(like) + makeup_ratio(blow_db) * blow
        group = [m for m in modes if lo <= m[0] < hi]
        out = out + makeup_ratio(held_db) * ring(force, group, damp, scatter_db, seated * 1)
        out = out + makeup_ratio(free_db) * ring(force, group, seat=seated * 2)
        out = out + makeup_ratio(clatter_db) * contact * band(colour(stereo(like), clatter), 1.09 * lo, .88 * hi)
    return out


def rubbed(spells, modes):
    t = np.arange(N) / SR
    song = ring(stereo(.72), modes) * (1 + 9 * uniform_filter1d(rng.standard_normal(N), 250))
    level = sum(makeup_ratio(db) * np.sin(np.pi * np.clip((t - s) / length, 0, 1)) for s, length, db in spells)
    return song / song.std() * level


SEAT_HZ = (2250, 2500, 3500, 4150, 4850, 5500, 6700, 8300)
# (from [s], levels at SEAT_HZ under the tool [dB], ringing freely [dB])
SEATS = [
    (0, (0, .1, -3, -3, 2, 4, .1, .1), (-2, -8, -8, -4, -2, 2, -6, -5)),
    (2.8, (0, .1, -3, .1, 2, .1, .1, .1), (.1, -3, -6, 2, .1, .1, .1, .1)),
    (4.3, (0, .1, .1, .1, .1, -3, .1, .1), (.1, -3, -7, -1, -3, .1, -3, .1)),
    (7.9, (-1, -2, 4, 0, 1, -4, 2, -1), (-2, -5, -7, 8, -4, -3, -3, -3)),
]


def seat_db(hz, holds, column):
    stud = np.searchsorted([row[0] for row in SEATS], np.arange(holds) * HOLD / SR, "right") - 1
    return np.array([np.interp(hz, SEAT_HZ, row[column]) for row in SEATS])[stud].T


def ring(x, modes, damp=.86, scatter_db=0, seat=None):
    longest_s, detune = .32, .002
    hz, db, t60 = np.reshape(modes, (-1, 3)).T
    r = np.exp(-np.log(1000) / (np.minimum(t60, longest_s) * damp * SR))
    db = db[:, None] + scatter_db * rng.standard_normal((len(hz), N // HOLD + 1))
    if seat:
        db = db + seat_db(hz, db.shape[1], seat)
    hz = hz[:, None] * (1 + detune * rng.standard_normal(db.shape))
    return resonate(np.atleast_2d(x) + 0., r, 2 * np.pi * hz / SR, makeup_ratio(db), HOLD)


@njit
def resonate(x, r, w, share, hold):
    out = np.zeros(x.shape)
    for m in range(len(r)):
        a, b, g = 2 * r[m] * np.cos(w[m]), r[m] ** 2, np.sin(w[m]) * share[m]
        for c in range(len(x)):
            y1 = y2 = 0.
            for i in range(x.shape[1]):
                y1, y2 = g[i // hold] * x[c, i] + a[i // hold] * y1 - b * y2 + 1e-18, y1
                out[c, i] += y1
    return out


def spikes(s, db):
    x = np.full(N, 1e-18)
    np.add.at(x, (np.asarray(s) * SR).astype(int), makeup_ratio(db))
    return x


def swell(x, rise_s, fall_s):
    up, down = np.exp(-1 / (rise_s * SR)), np.exp(-1 / (fall_s * SR))
    return signal.lfilter([1 - up], [1, -up], signal.lfilter([1], [1, -down], x))


def stereo(like):
    mid, side = rng.standard_normal((2, N))
    like = np.clip(like, 0, 1)
    mid, side = mid * np.sqrt((1 + like) / 2), side * np.sqrt((1 - like) / 2)
    return np.array([mid + side, mid - side])


def colour(x, spectrum):
    hz, db = np.transpose(spectrum)
    f = np.fft.rfftfreq(x.shape[-1], 1 / SR) + 1
    y = irfft(rfft(x) * makeup_ratio(np.interp(np.log(f), np.log(hz), db)), x.shape[-1])
    return y / np.sqrt(np.mean(y ** 2))


def band(x, lo_hz, hi_hz):
    return signal.sosfilt(signal.butter(2, [lo_hz, hi_hz], "bandpass", fs=SR, output="sos"), x)


def scene():
    room_db, near_db = -10.5, -4
    blows, knocked = hammer(), handling()
    echo = makeup_ratio(room_db) * walls(blows + makeup_ratio(near_db) * knocked)
    return blows + knocked + echo + drag() + garage()


def roll_off(x):
    return signal.sosfilt(signal.butter(12, 14870, fs=SR, output="sos"), x)


def record(dry):
    top = signal.ellip(10, .3, 80, 14300, fs=SR, output="sos")
    mix = signal.sosfilt(top, overload(tilt_ports(dry)))
    return roll_off(mix)


dry = scene()
out = record(dry)
transcribe(out)
```